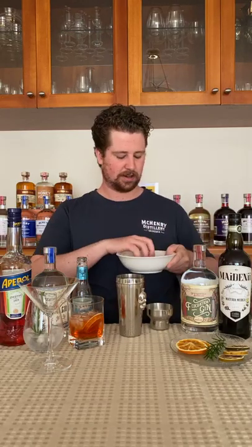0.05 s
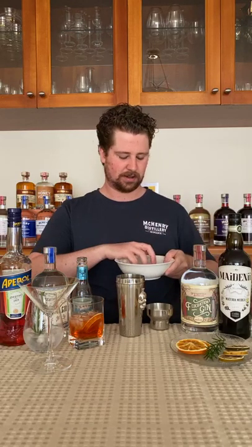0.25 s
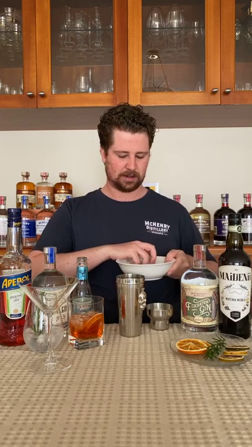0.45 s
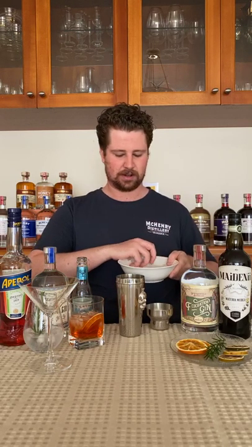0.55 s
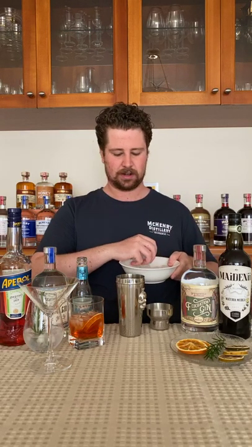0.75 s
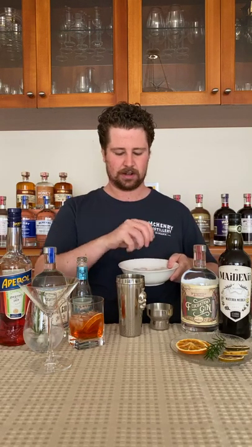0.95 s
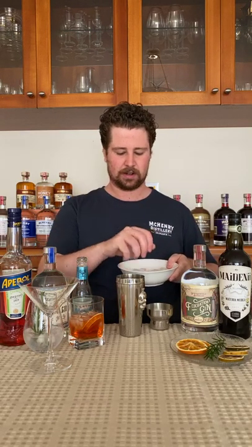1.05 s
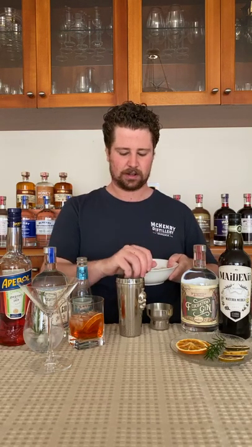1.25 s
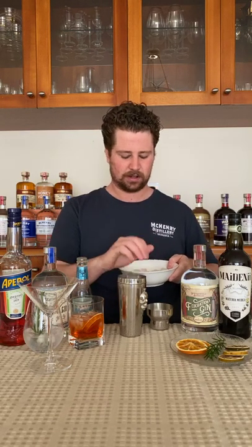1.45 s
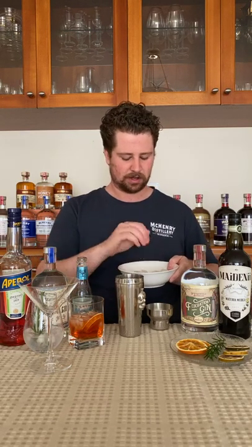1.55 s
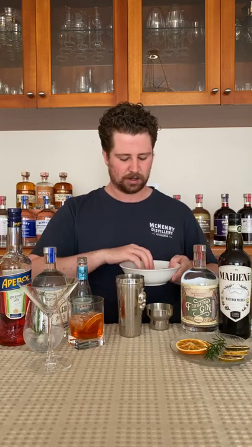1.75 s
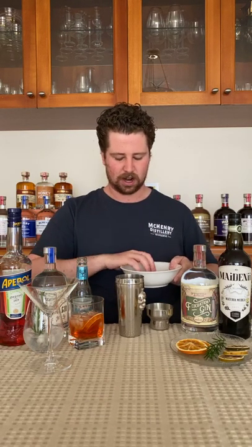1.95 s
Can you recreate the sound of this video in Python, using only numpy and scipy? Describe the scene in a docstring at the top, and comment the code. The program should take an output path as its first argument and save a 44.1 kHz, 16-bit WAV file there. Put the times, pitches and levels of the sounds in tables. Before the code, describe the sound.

Ice cubes rustle and click in a ceramic bowl, then drop into a steel shaker with a loud, ringing clatter.

```python
"""Ice into a cocktail shaker

A hand rummages through ice in a ceramic bowl, where the cubes slide, grate and tip over with small clicks.
It drops some into a steel shaker: they clip the rim, knock on the base, ring the metal and skitter to rest.
Then the hand goes back into the bowl. A hard-walled room echoes, and a limiter holds down the loudest blows."""
import sys
import numpy as np
from scipy import signal
from scipy.fft import rfft, irfft, next_fast_len
from scipy.io import wavfile
from scipy.ndimage import uniform_filter1d, minimum_filter1d

SR = 44100
rng = np.random.default_rng(int(sys.argv[2]) if len(sys.argv) > 2 else 0)


def int16_out(signal):
    """Quantize to a 16-bit WAV file."""
    q = np.round(np.clip(np.atleast_2d(signal).T, -1, 1) * 32767)
    wavfile.write(sys.argv[1], SR, q.astype(np.int16))


N = 88640
TOP_HZ = 15900  # the highest pitch kept

# the tone of the still room: pitch_hz, level_db
HUSH_TONE = [(20, -8), (35, -20), (55, 3), (110, -3.5), (300, -8), (1000, -17), (4000, -23), (7000, -21.5),
             (10000, -33.5), (16000, -30)]
# how long the room echoes (a fade time is the time to fall by 60 dB): pitch_hz, fade_s
ROOM_FADE = [(120, .45), (500, .52), (1400, .62), (3000, .56), (6500, .52), (9000, .37), (15000, .27)]
# echoes from nearby surfaces: delay_s, level_db
WALL_ECHOES = [(.0036, -21), (.0079, -15), (.0097, -15), (0.0149, -12.5), (0.0252, -14)]
# the tone of ice hitting ice: pitch_hz, level_db
ICE_TONE = [(150, -33), (280, -17), (450, -8), (900, 3), (1700, 1.5), (3200, 0), (5000, -3), (6800, -3.5),
            (7800, -14), (10500, -23), (15500, -20)]
# the bowl's notes, muffled by the palm and the ice: pitch_hz, level_db, fade_s
BOWL_NOTES = [(1104, -29, 0.063), (1680, -21, 0.039), (1812, -18.5, 0.088), (3340, -18.5, 0.1),
              (3740, -7, 0.011), (4747, -1, 0.018), (6520, -7, 0.031), (8580, -21, 0.026)]
# the fingers push through the ice: start_s, length_s, level_db
HAND_STROKES = [(0, 0.15, -44), (0.219, 0.075, -44.5), (0.409, 0.14, -46), (0.732, 0.099, -51),
                (1.95, .08, -54)]
# two cubes grate on each other: start_s, length_s, level_db, pitch_hz
CUBE_GRATES = [(.01, 0.027, -41, 2570), (.101, 0.026, -34.5, 2310), (0.817, .02, -39.5, 2587)]
# a cube tips over: start_s, level_db, on_bowl (0 lands on ice, 1 on the bowl), pitch_hz, loss_per_contact_db
CUBE_TUMBLES = [(.0045, -38.5, 0, 623, 1), (0.0223, -34, 0.47, 2340, -0.5), (0.0767, -27.5, 0.37, 3530, 4),
                (0.1013, -27, 0.81, 4370, 6), (0.1581, -33.5, 0.74, 8630, 3), (0.187, -30, 0.67, 3830, 4),
                (.231, -25, 0.99, 4670, 1), (0.257, -28, 0.073, 1350, 22), (.27, -25.5, 0.67, 3060, 4),
                (0.32, -31, 0.5, 4230, 9), (.354, -36, 0.41, 3480, 6), (0.409, -33.5, .5, 4460, 2.5),
                (0.513, -27.5, 0.75, 4540, 5.5), (0.6838, -35, 0.66, 2480, 6.5),
                (0.747, -43, 0.15, 3670, 1), (0.769, -28.5, 1, 4600, 7), (0.792, -36.5, 0.12, 3130, -2),
                (0.8197, -33.5, 0.72, 2460, 1.5), (.8822, -45, 0.22, 2600, 19),
                (1.081, -59, 0.32, 2310, -0.5), (1.202, -58.5, 0, 5600, 4), (1.243, -55, 0.41, 2350, 2),
                (1.9174, -46, 0, 3760, 2), (1.9456, -37.5, 0.23, 3540, -2.5)]
# the tone of ice cracking against steel: pitch_hz, level_db
CRACK_TONE = [(100, -36), (330, 0.5), (450, -5), (1000, 0.5), (2100, 2.5), (2600, -6), (3600, 6), (5700, 2),
              (7000, 8), (8200, -7.5), (9400, -1.5), (10800, -18.5), (13000, -8.5), (15500, -15)]
# the shaker's notes, struck at the rim or the base: pitch_hz, rim_level_db, base_level_db, fade_s
STEEL_NOTES = [(570, -23, -20.5, 0.2), (664.5, -36, 0, 0.43), (1129, -31, -13, 0.11), (1182, -40, -13, 0.2),
               (1342, -42, -17, 0.76), (1423, -22, -6, 0.214), (1554.6, -21.5, 6, 0.13),
               (1715, -11.5, -18, 0.19), (2150, -16.5, -17, 0.036), (2660, -24, -11, 0.34),
               (2890, -23, -9.5, 0.21), (3004, -2, -9.5, .14), (3075, -21, -12, 0.12),
               (3308, -4, -12.5, .13), (4964, -29, -12.5, 0.25), (5130, -40, 3, 0.18),
               (5260, -19, -8, 0.28), (5040, -21, -18, 0.4), (6200, -19, -22, 0.3), (6230, -51, -14, 0.14),
               (6470, -26, -41, .2), (7490, -17, -30, 0.29), (7410, -13, -12, 0.2), (8342, -32, -14, 0.34)]
# the notes of the counter under the shaker: pitch_hz, level_db, fade_s
COUNTER_NOTES = [(94, -6.5, 0.31), (125.7, -7.5, 0.16), (151.4, 4.5, 0.27), (209.7, -2, 0.26),
                 (254, -7, 0.29), (348.4, -0.5, 0.12), (383, -1, 0.2)]
# a landed cube skitters to rest: start_s, level_db, fade_s
CUBE_SKITTERS = [(1.446, -32.5, 0.39), (1.56, -29, 0.35)]
# cubes hit the shaker: start_s, crack_db, ring_db, depth (0 rim, 1 base), knock_db, knock_hz
CUBE_DROPS = [(1.3058, -41, -24.5, 0.088, -39, 967), (1.359, -33, -27, 0.031, -24, 548),
              (1.39, -9.5, -32.5, 0.89, -8.5, 1277), (1.399, -12.5, -28.5, 0.99, -8.5, 1442),
              (1.4426, -28, -16, 0.39, -31, 1440), (1.528, -13.5, -14, 0.91, -16.5, 658),
              (1.5343, -10.5, -21, 0.78, -13.5, 1180), (1.5429, -13.5, -9.5, 0.089, -28, 1620),
              (1.553, -13.5, -16, 0.54, -18, 1540)]


def amp(db):
    """Turn decibels into a number to multiply by."""
    return 10 ** (np.asarray(db) / 20)


def unit(x):
    """Scale a sound to an average (rms) strength of 1."""
    return x / np.sqrt(np.mean(x ** 2) + 1e-20)


def along(points, hz):
    """Read a table between its rows, on a musical pitch scale."""
    pitches, values = np.transpose(points)
    return np.interp(np.log(hz + 1), np.log(pitches), values)


def noise(tone_db, size):
    """Noise of strength 1, with its lows and highs shaped by tone_db(hz)."""
    spectrum = rfft(rng.standard_normal(size))
    return unit(irfft(spectrum * amp(tone_db(np.fft.rfftfreq(size, 1 / SR))), size))


def hump(hz, centre_hz, octaves):
    """A broad peak around one pitch, in dB."""
    return -10 * np.log10(1 + (np.log2((hz + 1) / centre_hz) / octaves) ** 2)


def fade(t, fade_s):
    """Die away by 60 dB every fade_s seconds."""
    return np.exp(-np.log(1000) * t / fade_s)


def ring(notes, t, scatter_db, detune):
    """A struck object's fading notes, a little new each time; neighbours swing opposite ways."""
    return sum((-1) ** k * amp(db + scatter_db * rng.normal()) * fade(t, fade_s)
               * np.sin(2 * np.pi * hz * (1 + detune * rng.normal()) * t)
               for k, (hz, db, fade_s) in enumerate(notes))


def room_hush():
    """The faint, low noise of a still room."""
    return amp(-66.5) * noise(lambda hz: along(HUSH_TONE, hz), N)


def in_room(sound, tail_db, build_s):
    """Hard walls add a few quick echoes, then a tail that builds up and dies fastest in the treble."""
    hz, t, bands = signal.stft(rng.standard_normal(SR * 3 // 4), SR, nperseg=256)
    bands = bands * fade(t, along(ROOM_FADE, hz)[:, None]) * (1 - np.exp(-t / build_s))
    tail = signal.istft(bands, SR, nperseg=256)[1]
    echoes = amp(tail_db) * tail / np.linalg.norm(tail)
    echoes[0] += 1  # the direct sound
    for delay_s, db in WALL_ECHOES:
        echoes[round(delay_s * SR)] += amp(db)
    return signal.fftconvolve(sound, echoes)[:N]


def add(track, start_s, sound):
    """Mix a sound into the track."""
    start = max(round(start_s * SR), 0)
    track[start:start + len(sound)] += sound[:max(N - start, 0)]


def hand_strength(rise_s=0.076, settle_s=0.26):
    """Each stroke rises as the cubes begin to slide, holds, and fades as they come to rest."""
    t = np.arange(N) / SR
    return sum(amp(db) * np.clip(1 + (t - start_s) / rise_s, 0, 1)
               * fade(np.maximum(t - start_s - length_s, 0), settle_s)
               for start_s, length_s, db in HAND_STROKES)


def bowl_rustle(per_second=240, spread_db=5, kinds=40, soft_hz=10000):
    """Cubes slide and catch on each other: a stream of tiny snaps of many pitches and sizes."""
    out, t = np.zeros(N), np.arange(SR // 30) / SR
    # sliding contacts are soft, so their treble falls away above soft_hz
    soft_ice = lambda hz: along(ICE_TONE, hz) + hump(np.maximum(hz, soft_hz), soft_hz, octaves=0.43)
    snaps = []
    for pitch_hz in np.geomspace(800, 7500, kinds):
        hiss = noise(lambda hz: soft_ice(hz) + hump(hz, pitch_hz, octaves=1), len(t))
        bowl = amp(-13) * ring(BOWL_NOTES, t, scatter_db=5, detune=0.093)
        snaps.append(unit(hiss * fade(t, 0.023) + bowl))
    for when, strength, kind in rng.random((int(per_second * N / SR), 3)):
        add(out, when * N / SR, amp(spread_db * np.sqrt(12) * strength) * snaps[int(kind * kinds)])
    return in_room(unit(out) * hand_strength(), tail_db=-3.5, build_s=0.00059)


def bowl_grates(per_second=700, spread_db=3):
    """One cube sticks and slips along another; the quick slips keep a hollow note of the ice sounding."""
    out, t = np.zeros(N), np.arange(SR // 25) / SR
    for start_s, length_s, db, pitch_hz in CUBE_GRATES:
        slips = np.zeros(round(length_s * SR))
        for when, strength in rng.random((int(per_second * length_s), 2)):
            slips[int(when * len(slips))] += amp(spread_db * np.sqrt(12) * strength)
        notes = [(pitch_hz * 0.914, -2, 0.012), (pitch_hz * 1.068, 0, 0.012)]
        grate = signal.fftconvolve(slips, ring(notes, t, scatter_db=1, detune=0.01))
        add(out, start_s, amp(db) * grate / grate[:len(slips)].std())
    return in_room(out, tail_db=-11, build_s=0.0011)


def bowl_clicks(contacts=3, gap_s=0.0076):
    """A tipped cube rocks from edge to edge; each contact snaps, clacks and rings the bowl."""
    out, t = np.zeros(N), np.arange(SR // 12) / SR
    onset = 1 - np.exp(-t / 0.0002)
    for start_s, db, on_bowl, pitch_hz, loss_db in CUBE_TUMBLES:
        # landing on ice gives more hollow clack, landing on the bowl more ring
        clack_db = np.interp(on_bowl, [0, 1], [2, -20.5])
        ring_db = np.interp(on_bowl, [0, 1], [-15.5, 6])
        clack_notes = [(pitch_hz, 0, 0.022), (pitch_hz * 0.94, -6, 0.014)]
        for k in range(contacts):
            hiss = noise(lambda hz: along(ICE_TONE, hz) + hump(hz, pitch_hz, octaves=0.48), len(t))
            snap = hiss * fade(t, 0.017)
            clack = amp(clack_db) * ring(clack_notes, t, scatter_db=-4, detune=0.011)
            bowl = amp(ring_db) * ring(BOWL_NOTES, t, scatter_db=2, detune=0.008)
            contact = amp(db - k * loss_db) * onset * (snap + clack + bowl)
            add(out, start_s + k * gap_s, in_room(contact, tail_db=-6, build_s=0.00044))
    return out


def ice_crack(t, tilt_db, fade_s):
    """Ice hits steel with a burst of noise; more tilt_db (per octave) makes it brighter."""
    tone_db = lambda hz: along(CRACK_TONE, hz) + tilt_db * np.log2(np.maximum(hz, 800) / 3000)
    return noise(tone_db, len(t)) * fade(t, fade_s)


def shaker_skitter(per_second=600, range_db=8):
    """Ice chatters along the wall: tiny cracks ring the steel and die away as the cube settles."""
    out, t = np.zeros(N), np.arange(SR // 2) / SR
    brief = t[:SR // 16]
    notes = [(hz, (rim_db + base_db) / 2, fade_s) for hz, rim_db, base_db, fade_s in STEEL_NOTES]
    for start_s, db, settle_s in CUBE_SKITTERS:
        run = np.zeros(N)
        for when, strength in rng.random((int(per_second * t[-1]), 2)):
            add(run, when * t[-1], amp(range_db * strength) * ice_crack(t[:512], tilt_db=2, fade_s=0.0023))
        ticks = unit(run[:len(t)]) * fade(t, settle_s)
        ping = ring(notes, brief, scatter_db=9, detune=0.00092) * fade(brief, 0.081)
        steel = amp(-16) * ticks.std() * unit(signal.fftconvolve(ticks, ping)[:len(t)])
        add(out, start_s, in_room(amp(db) * (ticks + steel), tail_db=-4, build_s=0.0026))
    return out


def wall_overtones(t, tilt_db, wall_hz, fade_s):
    """A hard blow rings the many close notes of the shaker's thin wall all at once."""
    gains = amp(along(CRACK_TONE, wall_hz) + tilt_db * np.log2(wall_hz / 3000))
    gains *= rng.standard_normal(len(wall_hz))
    waves = np.sin(2 * np.pi * wall_hz[:, None] * t)
    return np.sqrt(2) * gains @ waves * fade(t, fade_s) / np.linalg.norm(gains)


def base_knock(t, hz):
    """The base stands on the counter, so it gives a short knock of close notes and a low thud."""
    notes = [(hz * 0.855, -7, 0.03), (hz, 0, 0.042), (hz * 1.088, -7, 0.03), (hz * 1.4, -14, 0.025)]
    knock = ring(notes, t, scatter_db=4, detune=0.0066) * (1 - np.exp(-(t * hz) ** 2))
    thud = ring(COUNTER_NOTES, t, scatter_db=3.5, detune=0.02) * (1 - np.exp(-(t / 0.0075) ** 2))
    return knock + amp(-28) * thud


def shaker_hits(overtones=150):
    """A dropped cube cracks, knocks and rings the steel; where it lands sets the tone."""
    out, t = np.zeros(N), np.arange(SR * 2 // 5) / SR
    brief = t[:SR // 16]
    wall_hz = np.linspace(800, TOP_HZ, overtones) + rng.uniform(-50, 50, overtones)
    onset = 1 - np.exp(-t / 0.0003)
    muffle = 0.2 + 0.8 * fade(t, 0.12)  # the cube resting on the metal soon soaks up most of the ring
    for start_s, crack_db, ring_db, depth, knock_db, knock_hz in CUBE_DROPS:
        notes = [(hz, rim_db + depth * (base_db - rim_db), fade_s)
                 for hz, rim_db, base_db, fade_s in STEEL_NOTES]
        steel = amp(ring_db) * ring(notes, t, scatter_db=1, detune=0.0006) * muffle
        tilt_db = np.interp(depth, [0, 1], [11.5, -5.5])  # bright on the thin rim, dull on the base
        crack = ice_crack(t, tilt_db, fade_s=0.015)
        crack[:len(brief)] += amp(-3.5) * wall_overtones(brief, tilt_db, wall_hz, fade_s=0.058)
        blow = steel + amp(crack_db) * crack + amp(knock_db) * base_knock(t, knock_hz)
        add(out, start_s, in_room(onset * blow, tail_db=-8, build_s=0.0013))
    return out


def scene():
    """The hush of the room, the bowl and the shaker, mixed into one channel."""
    hush = room_hush()
    bowl = bowl_clicks() + bowl_rustle() + bowl_grates()
    shaker = shaker_hits() + shaker_skitter()
    return (hush + bowl + shaker)[None]


def record(dry):
    """A fast limiter turns down the loudest peaks, then everything above TOP_HZ is cut."""
    ceiling = 0.64
    needed_gain = np.minimum(1, ceiling / (np.abs(dry) + 1e-9))
    smooth_gain = uniform_filter1d(minimum_filter1d(needed_gain, size=133), size=89)
    size = next_fast_len(N + SR // 4)
    kept = np.fft.rfftfreq(size, 1 / SR) < TOP_HZ
    return irfft(rfft(dry * smooth_gain, size) * kept, size)[:, :N]


dry = scene()
out = record(dry)
int16_out(out)
```